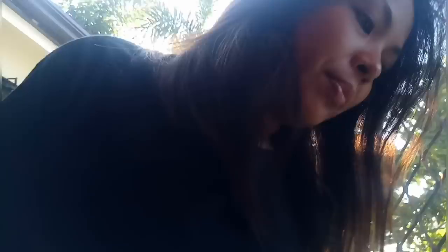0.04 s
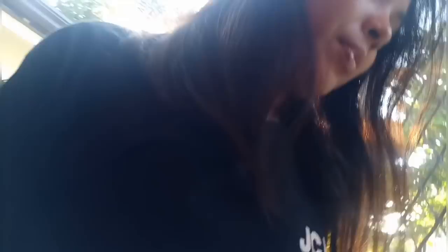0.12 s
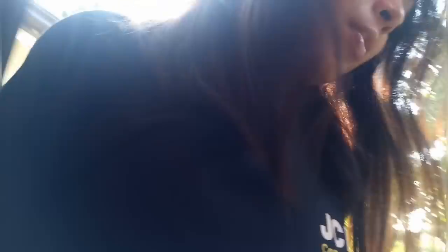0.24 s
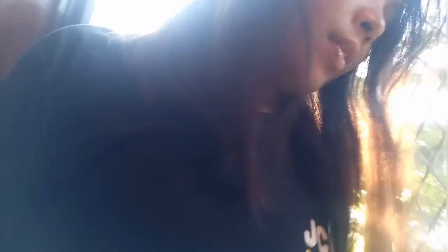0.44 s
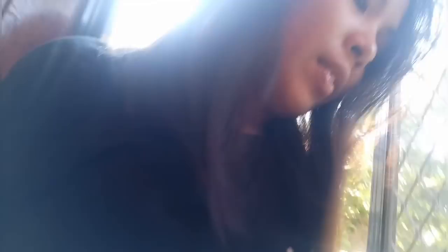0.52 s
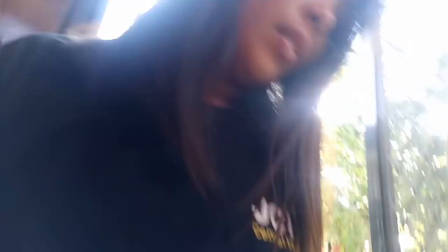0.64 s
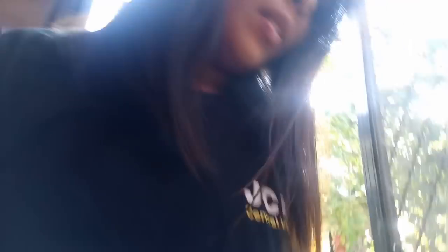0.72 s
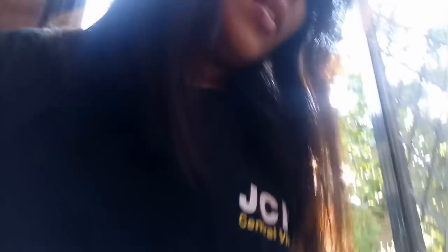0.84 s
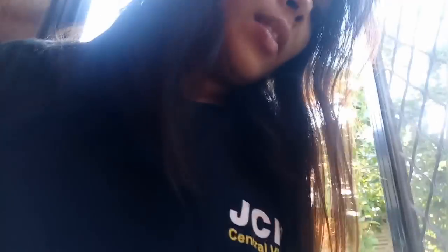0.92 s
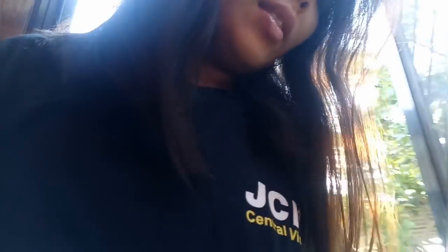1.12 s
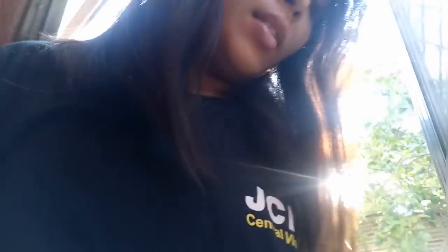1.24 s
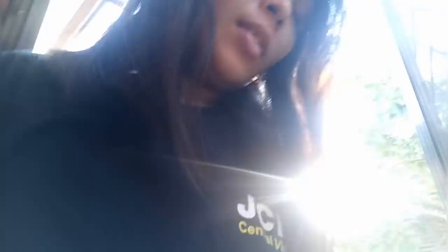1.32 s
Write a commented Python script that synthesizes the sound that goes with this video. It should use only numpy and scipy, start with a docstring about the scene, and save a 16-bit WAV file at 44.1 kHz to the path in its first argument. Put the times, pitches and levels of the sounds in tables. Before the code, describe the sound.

A metal gate hinge squeals from about 0.2 to 0.55 s, a thin, piercing, nearly pure tone, steady then sagging and roughening, close on the left. A sharp finger tap clicks at 0.56 s; a faint lower squeak and bar knocks follow around 0.6-0.8 s, with a faint low groan. Cloth rustle, rumble and finger scuffs continue, with another tap and knock near 1.1 s. Short outdoor echo, rough phone sound.

```python
"""Cloth rustles over a low rumble throughout, and fingers scuff and tap a hand-held phone outdoors.
A metal gate then squeals once on its hinge, close to the left port: a tone with an octave above it.
The pitch sags as it slows; a faint after-squeak follows, its bars knock and its frame groans low.
A decaying noise tail echoes hinge and bars; squeal, bars and taps are sines, the rest filtered noise.
The phone changes its sample rate crudely, which folds mirror tones around the squeal."""
import sys
import numpy as np
from scipy import signal
from scipy.io import wavfile
from scipy.ndimage import uniform_filter1d, map_coordinates

SR = 44100
rng = np.random.default_rng(int(sys.argv[2]) if len(sys.argv) > 2 else 0)


def pcm_store(signal):
    """Save signal as 16-bit PCM."""
    levels = np.round(np.clip(np.atleast_2d(signal), -1, 1) * 32767)
    wavfile.write(sys.argv[1], SR, levels.astype(np.int16).T)


N = 61740  # samples, 1.4 s


def undb(db):
    """Amplitude of a level in dB."""
    return 10 ** (np.asarray(db) / 20)


def unit(x):
    """Scale to an RMS of 1."""
    return x / np.sqrt(np.mean(x ** 2))


def curve(table):
    """Columns of a time table, interpolated at every sample."""
    rows = np.array(table, float).T
    clock_s = np.arange(N) / SR
    return [np.interp(clock_s, rows[0], column) for column in rows[1:]]


def walk(rate_hz):
    """Random levels held 1 / rate_hz and smoothed twice; RMS 1."""
    hold = int(SR / rate_hz)
    steps = np.repeat(rng.standard_normal(N // hold + 1), hold)
    return unit(uniform_filter1d(uniform_filter1d(steps, hold), hold)[:N])


def band(x, hz, width_hz):
    """Resonant band-pass, applied twice; width_hz is that of one pass."""
    b, a = signal.iirpeak(hz, hz / width_hz, SR)
    return signal.lfilter(b, a, signal.lfilter(b, a, x))


def ports(pan_db):
    """Gains of left and right port, keeping the mid level of unrelated sounds."""
    right = undb(-np.asarray(pan_db))
    return np.array([1 + 0 * right, right]) * 2 / np.sqrt(1 + right ** 2)


def decay(t_s, t60_s):
    """Exponential fall of 60 dB in t60_s."""
    return np.exp(-np.log(1000) * t_s / t60_s)


def ring(t_s, hz, t60_s):
    """Damped sine of one mode."""
    return np.sin(2 * np.pi * hz * t_s) * decay(t_s, t60_s) * (t_s > 0)


def gate_on(table):
    """1 while a table lasts, faded over 4 ms at both ends."""
    t_s = np.arange(N) / SR
    return np.clip(np.minimum(t_s - table[0][0], table[-1][0] - t_s) / .004, 0, 1)


# stereo balance of the noise beds: (frequency [Hz], left minus right [dB])
BED_BALANCE = [(60, 25), (110, 7.5), (200, 10), (360, 5.5), (660, 6), (1190, 9), (2170, 17), (3950, 3),
               (7180, 15.5), (13000, 13)]


def bed(spectrum, alike, flicker_db, grain_db, level_db):
    """Third-octave noise bands, each flickering alone; level_db(hz) is the level curve of each."""
    bands = []
    spec_hz, spec_db = np.array(spectrum).T
    bal_hz, bal_db = np.array(BED_BALANCE).T
    count = int(3 * np.log2(spec_hz[-1] / spec_hz[0]))
    centres_hz = np.geomspace(spec_hz[0], spec_hz[-1], count)
    for hz in centres_hz:
        a, b = rng.standard_normal((2, N)) * undb(grain_db * walk(400))
        right = alike * a + np.sqrt(1 - alike ** 2) * b  # alike = correlation of the ports
        pair = band(np.array([a, right]), hz, hz / 3)
        db = np.interp(np.log(hz), np.log(spec_hz), spec_db) + flicker_db * walk(11.83)
        pan_db = np.interp(np.log(hz), np.log(bal_hz), bal_db)
        bands.append(undb(db) * pair * ports(pan_db)[:, None])
    mid_rms = np.sqrt(np.mean(sum(bands).mean(axis=0) ** 2))
    return sum(undb(level_db(hz)) * x for hz, x in zip(centres_hz, bands)) / mid_rms


# cloth level before RUSTLE_GAIN_DB: (time [s], treble level [dB], middle level [dB])
RUSTLE = [(0.0, -61, -59.5), (0.132, -52.5, -51), (0.256, -73, -63), (0.378, -49.5, -55), (0.448, -51, -50),
          (0.572, -57.5, -48), (0.7, -68, -56.5), (0.854, -63.5, -65), (0.974, -60.5, -59.5),
          (1.114, -59.5, -47), (1.228, -57, -56), (1.4, -54, -57)]
# cloth spectrum, relative: (frequency [Hz], density [dB per Hz])
CLOTH = [(160, -43), (280, -9), (688, -6), (821, 2), (1010, -26), (1150, -10.5), (1510, -1), (4360, 0),
         (5550, 9), (7530, -32.5), (13000, -45)]
RUSTLE_GAIN_DB, SPLIT_HZ = 3.5, 3500


def cloth():
    """Rubbing cloth: grainy noise, unrelated at the ports; treble and middle swell separately."""
    treble_db, middle_db = curve(RUSTLE)

    def level_db(hz):
        return RUSTLE_GAIN_DB + (treble_db if hz > SPLIT_HZ else middle_db)

    return bed(CLOTH, alike=0, flicker_db=3.5, grain_db=2, level_db=level_db)


# rumble level before RUMBLE_GAIN_DB: (time [s], level [dB])
RUMBLE = [(0.0, -58.5), (0.166, -63), (0.19, -69), (0.65, -58.5), (0.678, -60.5), (0.748, -69.5),
          (1.122, -56), (1.142, -71.5), (1.236, -68.5), (1.344, -55), (1.4, -57.5)]
# rumble spectrum, relative: (frequency [Hz], density [dB per Hz])
LOWS = [(15, -41), (25, -16), (54, 2), (81, -3.5), (124, 4.5), (156, -1.5), (231, -7), (300, -23.5),
        (390, -32), (660, -120)]
RUMBLE_GAIN_DB = -2


def rumble():
    """Low noise, largely alike at both ports."""
    level = RUMBLE_GAIN_DB + curve(RUMBLE)[0]
    return bed(LOWS, alike=.8, flicker_db=3.2, grain_db=0, level_db=lambda hz: level)


# finger scuffs: (time [s], level [dB], left minus right [dB], centre [Hz], width of one pass [Hz],
# attack [s], t60 [s])
SCUFFS = [(0.282, -35.5, 6, 4800, 1890, 0.0024, 0.13), (0.277, -46.5, 13, 1580, 1370, 0.0031, 0.16),
          (.419, -41, 5, 5100, 2500, .004, .11), (.42, -44, 8, 1900, 1500, .004, .11),
          (0.51, -42, -3, 3960, 2778, 0.0026, 0.081), (.653, -36, 10, 2650, 1120, 0.0011, 0.065),
          (1.114, -41, 15, 1970, 885, 0.0013, 0.079), (.658, -43, 7.5, 790, 1540, 0.004, 0.22),
          (0.664, -50.5, 9, 177, 250, 0.011, 0.16), (0.772, -53, 8.5, 3470, 3780, 0.015, 0.21),
          (0.9223, -43.5, 4.5, 4860, 1450, 0.00068, 0.033), (.068, -45, 16, 1900, 1600, 0.00055, 0.029),
          (0.871, -57.5, 14, 1690, 617, 0.011, 0.31), (0.983, -51.5, 9.5, 4350, 1852, 0.023, 0.25),
          (1.1143, -32.5, 7.5, 5000, 2620, 0.00095, 0.039), (1.125, -43.5, 5.5, 2800, 4570, 0.0037, 0.15),
          (1.152, -50, 9, 3170, 696, 0.0069, 0.12)]
SCUFF_GRAIN_DB = 3


def scuffs():
    """Skin dragging on the phone: grainy band-passed noise bursts."""
    out, clock_s = np.zeros((2, N)), np.arange(N) / SR
    for start_s, db, pan_db, hz, width_hz, attack_s, t60_s in SCUFFS:
        t_s = np.maximum(clock_s - start_s, 0)
        grains = rng.standard_normal((2, N)) * undb(SCUFF_GRAIN_DB * walk(500))
        shape = (1 - np.exp(-t_s / attack_s)) ** 2 * decay(t_s, t60_s)
        burst = unit(band(grains, hz, width_hz)) * shape / shape.max()
        out += undb(db) * ports(pan_db)[:, None] * burst
    return out


# squeal, then after-squeak: (time [s], pitch [Hz], level [dB], left minus right [dB],
# roughness [0-1], octave re fundamental [dB])
SQUEAL = [
    [(.19, 3220, -76, 12, 0.01, -36), (.199, 3261, -26.5, 14, 0, -31), (.208, 3370, -24, 10, 0.21, -36),
     (.22, 3361, -26.5, 17, 0.1, -28), (.246, 3382, -22.5, 16, 0.09, -23.5),
     (.282, 3370, -19.5, 18, 0.05, -27), (.298, 3362, -22, 23, 0, -39), (.32, 3360, -19, 23, 0.03, -38),
     (.348, 3358, -19, 17.5, 0.09, -39), (.372, 3355, -21.5, 15, 0.08, -44),
     (.388, 3312, -26.5, 4.5, 0, -25), (.413, 3306, -24, 4.5, 0, -26), (.424, 3261, -31, 12, 0.16, -8.5),
     (.478, 3190, -31, 7.5, 0.19, -18.5), (.495, 3075, -31.5, 7.5, 0.36, -27),
     (.503, 2873, -30, 21, 0.4, -15.5), (.511, 2690, -33, 10, 0.37, -8.5), (.532, 2676, -44.5, 2, 0.6, -27),
     (.553, 2670, -55, -1, 0.44, -33)],
    [(.598, 2220, -64, 3, 0.28, -27), (.614, 2315, -53, 8, 0.3, -38), (.644, 2230, -52, 8, 0.26, -42)],
]
# lag of the right port as the gate swings, before drift: (time [s], lag [ms])
PORT_LAG = [(.2, 0.069), (.365, 0.11), (.39, 0.023), (.42, 0.019), (.44, 0.083)]
WAVER_HZ, JITTER_HZ = 7, 110  # RMS pitch wander; jitter at full roughness
FLUTTER_RATE_HZ, LAG_DRIFT_MS = 170, .04


def hinge():
    """Stick-slip locked to one tone; it flutters as the grip loosens and reaches the right port late."""
    out = 0
    for table in SQUEAL:
        hz, db, pan_db, rough, octave_db = curve(table)
        pitch_hz = hz + WAVER_HZ * walk(60.5) + JITTER_HZ * rough * walk(250)
        phase = 2 * np.pi * np.cumsum(pitch_hz) / SR

        def at_port(lag_s):
            late = phase - 2 * np.pi * hz * lag_s
            flutter = 1 + rough * walk(FLUTTER_RATE_HZ)
            return flutter * (np.sin(late) + undb(octave_db) * np.sin(2 * late))

        lag_s = (curve(PORT_LAG)[0] + LAG_DRIFT_MS * walk(24.38)) / 1e3
        pair = np.array([at_port(0), at_port(lag_s)])
        out = out + np.sqrt(2) * undb(db) * gate_on(table) * ports(pan_db) * pair
    return out


# finger taps: (time [s], tick level [dB], left minus right [dB], case thump re tick [dB])
TAPS = [(0.286, -43, 10, -31), (0.5562, -9, 17, -12), (0.559, -33, 14, -6), (0.9242, -44, 11, -34),
        (1.0834, -23, 20, -24)]
TICK_HZ, TICK_T60_S = 3600, .00092
CASE_HZ, CASE_T60_S, CASE_LATE_S = 547, .0055, .00028
TAP_LOW_HZ = 416


def taps():
    """Fingertip on the phone: a tick, then an inverted thump of the case, high-passed."""
    out, clock_s = np.zeros((2, N)), np.arange(N) / SR
    high_pass = signal.butter(2, TAP_LOW_HZ, "high", fs=SR, output="sos")
    for start_s, db, pan_db, case_db in TAPS:
        t_s = np.maximum(clock_s - start_s, 0)
        tick = ring(t_s, TICK_HZ, TICK_T60_S)
        thump = ring(np.maximum(t_s - CASE_LATE_S, 0), CASE_HZ, CASE_T60_S)
        tap = signal.sosfilt(high_pass, tick - undb(case_db) * thump)
        out += undb(db) * ports(pan_db)[:, None] * tap
    return out


# knocks: (time [s], peak before port gains [dB], left minus right [dB], contact softness [s],
# centre of the ring [Hz])
KNOCKS = [(0.6436, -35, 11, 0.0019, 1200), (.6538, -27.5, 9.5, 0.0014, 2300),
          (.665, -35.5, -1, 0.0021, 780), (.784, -44, 9, 0.0044, 1350), (1.116, -37.5, 8, 0.0021, 1600)]
# bar modes: (frequency [Hz], level before scatter and slope [dB], t60 [s])
BARS = [(437, 4.5, 0.051), (730, -5.5, 0.16), (1016.4, -5.5, 0.17), (1205.5, 6, 0.057), (1317, 6.5, 0.041),
        (1451, 7, 0.042), (1561, 1, 0.077), (2220, -10.5, 0.086), (2660, -7, 0.016), (3320, -19, 0.036),
        (4160, -6, 0.054)]
BAR_SCATTER_DB, KNOCK_SLOPE_DB = 4, 12  # slope: fall per octave from the centre


def bars():
    """Each knock eases in and rings the same bar modes with its own weights and polarities."""
    out, t_s = np.zeros((2, N)), np.arange(N // 8) / SR
    for start_s, db, pan_db, soft_s, centre_hz in KNOCKS:
        chance = rng.standard_normal((2, len(BARS), 2))
        i = int(start_s * SR)
        for port in range(2):
            body = 0
            for (hz, mode_db, t60_s), (scatter, polarity) in zip(BARS, chance[port]):
                slope_db = KNOCK_SLOPE_DB * abs(np.log2(hz / centre_hz))
                gain = undb(mode_db + BAR_SCATTER_DB * scatter - slope_db)
                body = body + gain * np.sign(polarity) * ring(t_s, hz, t60_s)
            body = body * (1 - np.exp(-t_s / soft_s))
            out[port, i:i + len(t_s)] += undb(db) * ports(pan_db)[port] * body / np.abs(body).max()
    return out


# groan of the gate frame: (time [s], level [dB])
GROAN = [(.715, -60), (.75, -58.5), (.79, -63.5), (.83, -58.5), (.87, -74)]
GROAN_HZ, GROAN_WIDTH_HZ = 231, 62  # width of one pass


def frame():
    """A brief rough groan: noise in one low resonance, alike at both ports."""
    drone = unit(band(rng.standard_normal(N), GROAN_HZ, GROAN_WIDTH_HZ))
    return undb(curve(GROAN)[0]) * gate_on(GROAN) * drone * ports(10.6)[:, None]


ECHO_T60_S, ECHO_DB = .45, -11


def yard(gate):
    """Diffuse echo: the left-port gate sound convolved with decaying noise after a 3 ms gap."""
    t_s = np.arange(N // 3) / SR
    tail = rng.standard_normal((2, len(t_s))) * decay(t_s, ECHO_T60_S) * (t_s > .003)
    tail = tail / np.sqrt(np.sum(tail[0] ** 2))
    wet = signal.fftconvolve(gate[:1], tail, axes=1)[:, :N]
    return undb(ECHO_DB) * wet * ports(9.5)[:, None] / 2


def scene():
    """Sum of all sources; only hinge and bars echo."""
    gate = hinge() + bars()
    return cloth() + rumble() + scuffs() + gate + yard(gate) + taps() + frame()


MIC_TOP_HZ, TOP_HZ, PHONE_RATE_HZ = 6740, 13200, 47989.4
SAW_ORDER = 14  # harmonics of the timing error


def record(dry):
    """The microphone dulls the treble; converting from its own rate, the phone slips to the
    nearest sample, a sawtooth timing error; it cuts the top."""
    dull = signal.sosfilt(signal.butter(3, MIC_TOP_HZ, fs=SR, output="sos"), dry)
    place = np.arange(N) * PHONE_RATE_HZ / SR  # in phone samples
    slip = sum((-1) ** k * np.sin(2 * np.pi * k * place) / (np.pi * k) for k in range(1, SAW_ORDER + 1))
    read_at = (place + slip) * SR / PHONE_RATE_HZ
    kept = np.array([map_coordinates(x, [read_at], order=5, mode="mirror") for x in dull])
    return signal.sosfilt(signal.ellip(10, .2, 80, TOP_HZ, fs=SR, output="sos"), kept)


dry = scene()
out = record(dry)
pcm_store(out)
```